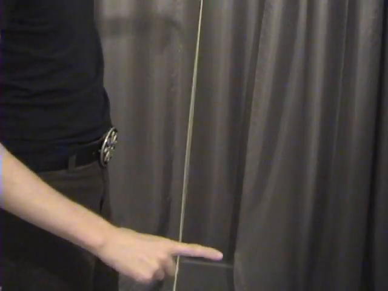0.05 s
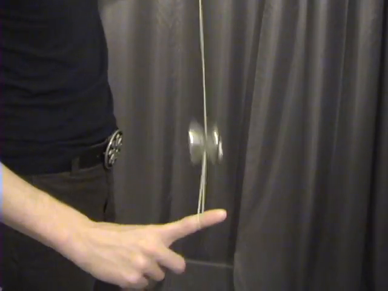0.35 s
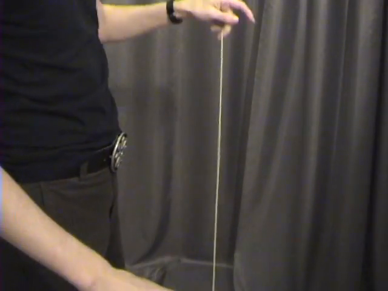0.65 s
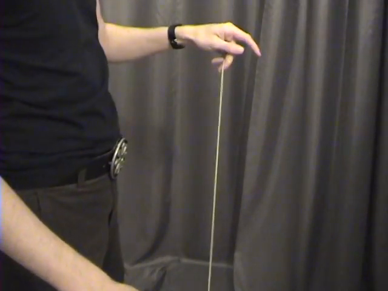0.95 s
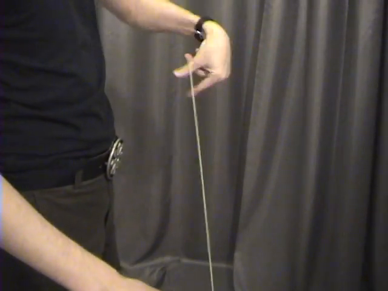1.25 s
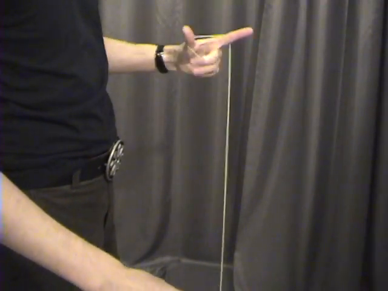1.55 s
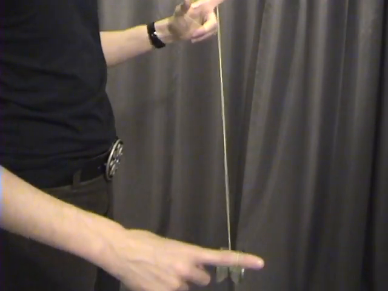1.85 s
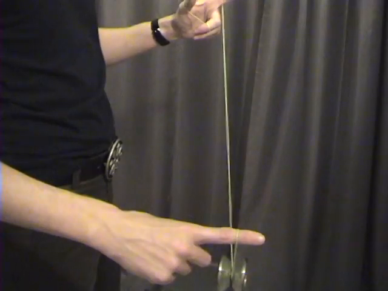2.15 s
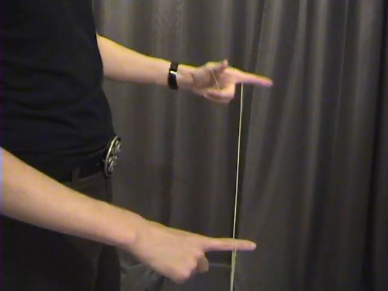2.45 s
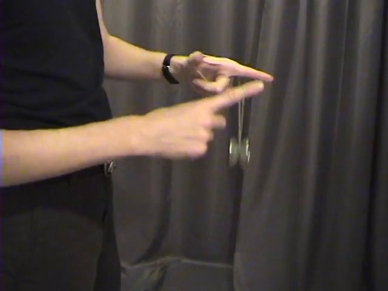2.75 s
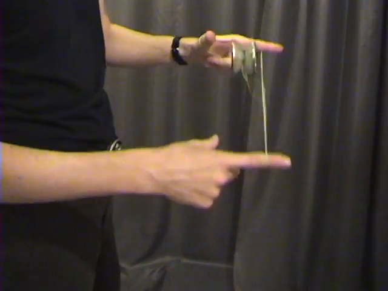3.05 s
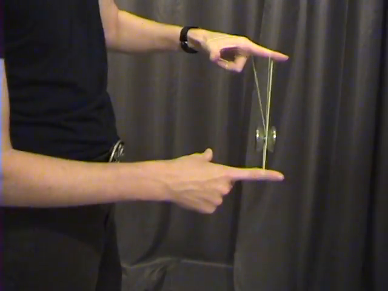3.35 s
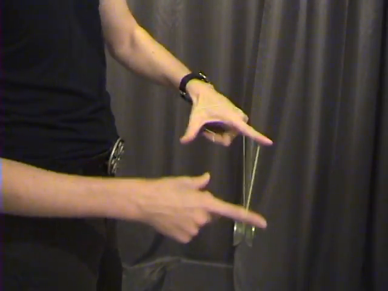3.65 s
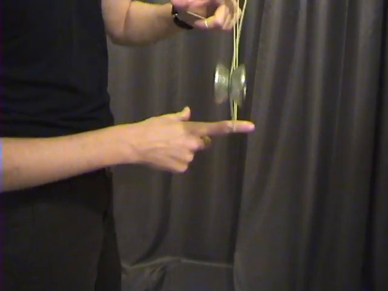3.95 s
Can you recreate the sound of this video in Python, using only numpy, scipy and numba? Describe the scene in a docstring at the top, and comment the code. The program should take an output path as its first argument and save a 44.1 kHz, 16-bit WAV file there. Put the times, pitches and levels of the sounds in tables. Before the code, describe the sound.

A yo-yo spins on its string with a high, whirring hiss over faint room hum.

```python
"""A ball-bearing yo-yo spins on its string in a curtained room, close to a small camera.
Impacts of the balls excite the bearing's bright resonance, which throbs once a turn as the spin runs down.
Friction of the string on the rims adds hiss; interference with a close reflection makes both swoosh
as the yo-yo is swung and hopped. A faint motor hum and room noise lie beneath."""
import sys
import numpy as np
from scipy import signal
from scipy.fft import rfft, irfft
from scipy.io import wavfile
from scipy.ndimage import uniform_filter1d, map_coordinates
from numba import njit

SR = 44100
rng = np.random.default_rng(int(sys.argv[2]) if len(sys.argv) > 2 else 0)


def wav_record(signal):
    """Record a signal, one row per channel, as 16-bit PCM in the file named by sys.argv[1]."""
    frames = np.transpose(np.atleast_2d(signal))
    bounded = np.clip(frames, -1, 1)
    # unit amplitude maps onto the largest positive 16-bit level
    quanta = np.round(bounded * 32767).astype(np.int16)
    wavfile.write(sys.argv[1], SR, quanta)


N = 176400
TIME_S = np.arange(N) / SR

# Loudness of the bearing's ring as it swells and dips: time_s, level_db
BEARING_LEVEL = [(0, -35), (.17, -29.5), (.29, -25.5), (.36, -31.5), (.46, -40), (.54, -30.5), (.6, -31),
                 (1.0, -32), (1.33, -34.5), (1.42, -31), (1.93, -30), (2.1, -30), (2.22, -33.5),
                 (2.39, -27.5), (2.47, -32), (2.68, -30), (2.78, -33.5), (2.84, -29.5), (2.99, -37.5),
                 (3.08, -33), (3.45, -32), (3.62, -34.5), (3.8, -30.5), (3.88, -32.5), (4, -36)]
# Once-a-turn modulation: time_s, depth_db
THROB_DEPTH = [(0, 1), (1.35, -3), (1.6, 2), (2.1, 2), (2.3, 0), (4, 1.5)]
# Response of bearing and shell: frequency_hz, gain_db
BEARING_SPECTRUM = [(2000, -46), (2660, -24.5), (3200, -39.5), (4250, -22.5), (4520, -15), (4700, -15.5),
                    (4920, -6), (5130, -2.5), (5320, -1.5), (5540, -2), (5800, -5.5), (6200, -13),
                    (6700, -16.5), (7350, -30.5), (8150, -18.5), (8600, -22.5), (9250, -25.5), (10500, -35),
                    (12000, -39.5), (13300, -40), (15000, -59)]
# Centre of the bright ring, swaying slightly in pitch: time_s, pitch_hz
RING_PITCH = [(0, 5350), (.23, 5080), (.36, 5480), (.44, 5200), (.8, 5290), (1.42, 5400), (1.52, 5270),
              (2.3, 5300), (2.66, 5440), (2.74, 5200), (2.86, 5170), (3.2, 5280), (3.5, 5430), (3.8, 5380),
              (3.91, 5100), (4, 5200)]
# Colour of ticks and string brushes: frequency_hz, gain_db
TICK_SPECTRUM = [(3000, -25), (5300, -3), (7000, -6), (8200, 0), (9200, -8), (10500, -5), (12000, -21),
                 (13300, -22), (15000, -38)]
def bearing(spin_hz=88.75, slowing_hz_per_s=4.5, impacts_per_s=2800, ticks_per_s=170):
    """Impact excitation: the balls ring the bearing, harder once a turn; a few hard hits tick."""
    turns = np.cumsum(spin_hz - slowing_hz_per_s * TIME_S) / SR
    flutter_db = .8 * walk(hz=43.8)
    throb = undb(curve(THROB_DEPTH) * np.cos(2 * np.pi * turns) + flutter_db)
    impacts = impulses(impacts_per_s, spread_db=3.1) * np.sign(noise())
    fizz = undb(-10) * noise()
    ring = colour((unit(impacts) + fizz) * throb, BEARING_SPECTRUM)
    ring = ring + undb(2.5) * resonate(ring, curve(RING_PITCH), width_hz=350.)
    ring = reflect(ring, echo_db=-8.5)
    ring = ring / np.sqrt(uniform_filter1d(ring ** 2, size=3000))  # even out slow level changes
    hard_hits = impulses(ticks_per_s * throb, spread_db=3) * throb
    ticks = undb(-21.5) * unit(colour(hard_hits, TICK_SPECTRUM))
    return (ring + ticks) * undb(curve(BEARING_LEVEL))


# Jerks of the string: centre_s, peak_db
JERKS = [(.164, -21), (.227, -19), (.2703, -14.5), (.3063, -21), (.3165, -21), (.524, -22), (.6145, -24),
         (.769, -21), (1.042, -21), (1.1195, -23), (1.131, -19.5), (1.413, -21), (1.519, -22),
         (1.6695, -21), (1.7185, -21), (2.3185, -14.5), (2.4078, -18), (2.472, -20), (2.519, -22),
         (2.826, -20)]
def knocks(pitch_hz=5310, sigma_s=.00092):
    """Backlash: each jerk knocks the bearing through its play, giving a Gaussian tone burst."""
    envelope = sum(undb(db) * np.exp(-((TIME_S - at) / sigma_s) ** 2 / 2) for at, db in JERKS)
    wavering_hz = pitch_hz * (1 + .023 * walk(hz=289.2))
    return envelope * np.sin(2 * np.pi * np.cumsum(wavering_hz) / SR)


# String rubbing the rims: time_s, level_db
RUB_LEVEL = [(0, -43), (.16, -46.5), (.23, -35.5), (.3, -39.5), (.39, -37.5), (.47, -43), (.62, -48.5),
             (1.2, -49.5), (1.7, -45.5), (2.45, -46.5), (2.68, -45.5), (3.11, -42), (3.3, -47),
             (3.8, -44.5), (4, -37)]
# Hiss of the fibres: frequency_hz, gain_db
FIBRE_SPECTRUM = [(2000, -28), (3500, -16.5), (5000, -3.5), (6500, 1.5), (7400, -5.5), (9000, -5.5),
                  (10300, -18), (12000, -24), (13300, -24), (15000, -33)]
# String brushing the shell: centre_s, half_width_s, level_db
SHELL_BRUSHES = [(.25, .05, -49), (.53, .025, -51), (1.66, .03, -51), (1.87, .03, -50), (2.09, .02, -49),
                 (2.34, .04, -47), (2.781, .002, -43)]
def string(roughness_db=3.5):
    """Sliding friction: the string hisses on the rims and briefly brushes the shell."""
    friction = noise() * undb(roughness_db * walk(hz=320))
    rub = undb(curve(RUB_LEVEL)) * unit(colour(friction, FIBRE_SPECTRUM))
    brushes = swells(SHELL_BRUSHES) * unit(colour(friction, TICK_SPECTRUM))
    return reflect(rub + brushes, echo_db=-2.5)


# Lag of the close reflection as the yo-yo moves: time_s, lag_ms
ECHO_LAG = [(0, .38), (.13, .31), (.19, .58), (.25, .6), (.36, .51), (.42, .455), (.53, .385), (.62, .22),
            (1.03, .22), (1.38, .3), (1.52, .39), (2.4, .385), (2.53, .325), (2.67, .32), (2.74, .39),
            (2.83, .4), (2.9, .455), (3.02, .46), (3.27, .31), (3.7, .3), (3.89, .41), (4, .45)]
def reflect(x, echo_db):
    """Comb filtering: a slightly dull reflection with a moving lag interferes with the direct sound."""
    dull = uniform_filter1d(x, size=3)
    lag_samples = curve(ECHO_LAG) * SR / 1000
    echo = map_coordinates(dull, [np.arange(N) - lag_samples], mode="mirror")
    return (x + undb(echo_db) * echo) / np.hypot(1, undb(echo_db))


# Motor partials: pitch_hz, left_db, right_db
MOTOR_PARTIALS = [(275.1, -60, -67), (292.9, -57, -66.5), (323.2, -60.5, -84), (361.7, -66.5, -80),
                  (470.6, -60.5, -74), (571, -56.5, -62), (614, -62, -85), (766, -60.5, -82),
                  (823, -59.5, -81), (1266, -76, -82), (1453, -73, -60), (1572, -63.5, -73.5),
                  (1740, -74, -76), (2111, -68, -66.5), (2194, -77, -73), (2214, -72, -68),
                  (2530, -60, -72), (2693, -68, -84)]
def motor(waver_rad=.6, left_lag_rad=.96):
    """Line spectrum: a small motor hums in steady partials that waver slightly in phase."""
    hum = 0
    for hz, left_db, right_db in MOTOR_PARTIALS:
        phase = 2 * np.pi * (hz * TIME_S + rng.random()) + waver_rad * walk(hz=10.4)
        left = undb(left_db) * np.sin(phase - left_lag_rad)
        right = undb(right_db) * np.sin(phase)
        hum = hum + np.sqrt(2) * np.array([left, right])
    return hum


# Tones in the whirr: centre_s, half_width_s, level_db, pitch_hz, waver_hz
HOLLOW_TONES = [(.005, 0.034, -45.5, 1140, 29.8), (1.044, 0.031, -56.5, 640, 46),
                (1.632, 0.026, -47, 561.4, 420), (1.737, 0.14, -52.5, 640, 60),
                (1.97, .13, -53.5, 559.6, 23), (2.1, 0.046, -50.5, 1100, 62), (2.34, 0.023, -56, 1360, 30),
                (2.37, 0.045, -53, 625, 44), (2.655, 0.11, -56, 663, 74), (2.758, 0.056, -51, 1078, 10),
                (3.543, 0.063, -53.5, 623, 74), (3.69, 0.067, -50.5, 1073, 8)]
def hollow_tones():
    """Random phase modulation widens faint, swelling tones into hollow narrow bands."""
    tones = 0
    for at, half_width, db, pitch_hz, waver_hz in HOLLOW_TONES:
        phase = 2 * np.pi * pitch_hz * TIME_S + walk(waver_hz)
        tones = tones + swells([(at, half_width, db)]) * np.sqrt(2) * np.sin(phase)
    return tones


# Motor whirr and room noise: frequency_hz, gain_db
WHIRR_SPECTRUM = [(20, -28), (48, -5), (75, -16.5), (150, -5), (240, -8), (282, 1), (340, -7), (420, -5),
                  (530, -1), (650, 5), (760, -4), (930, -5), (1090, 4), (1270, -4.5), (1400, -4),
                  (1500, 2.5), (1650, -14.5), (1900, -15), (2180, -8.5), (2370, -15.5), (2660, -3),
                  (2850, -14.5), (3300, -16), (6000, -6), (14000, -58)]
# Air stirred by the arms: centre_s, half_width_s, level_db
AIR_PUFFS = [(2.57, 0.056, -61), (3.1, 0.093, -62), (3.58, 0.059, -58)]
# Colour of the puffs: frequency_hz, gain_db
PUFF_SPECTRUM = [(12, -10), (30, -1), (60, -1), (150, -26), (600, -70)]
def whirr_and_puffs(whirr_db=-42.5):
    """Continuous spectra: steady motor and room noise, and low puffs of air from the moving arms."""
    whirr = undb(whirr_db) * unit(colour(noise(), WHIRR_SPECTRUM))
    puffs = swells(AIR_PUFFS) * unit(colour(noise(), PUFF_SPECTRUM))
    return whirr + puffs


def place(source, image):
    """Partial coherence: two microphones share the direct sound; each adds its own diffuse part."""
    lead_rad = over_bins(image, column=1)
    balance = undb(over_bins(image, column=2))
    diffuse = undb(over_bins(image, column=3))
    direct, channels = rfft(source()), []
    for side in (1, -1):  # left, right
        heard = direct * np.exp(.5j * side * lead_rad) + diffuse * rfft(source())
        pan = np.sqrt(2 / (1 + balance ** (-2 * side)))
        channels.append(irfft(heard * pan / np.hypot(1, diffuse), N))
    return np.array(channels)


def undb(db):
    """Decibels to gain."""
    return 10 ** (np.asarray(db) / 20)


def unit(x):
    """Scale to rms 1."""
    return x / np.sqrt(np.mean(x ** 2))


def curve(rows):
    """Linear interpolation over time."""
    return np.interp(TIME_S, *np.transpose(rows))


def over_bins(rows, column=1):
    """Interpolation of one column over log frequency."""
    rows = np.array(rows)
    bin_hz = np.arange(N // 2 + 1) * SR / N
    return np.interp(np.log(bin_hz + 1), np.log(rows[:, 0]), rows[:, column])


def colour(x, spectrum):
    """Minimum-phase filter: folding the cepstrum makes the response causal."""
    cepstrum = irfft(np.log(undb(over_bins(spectrum))), N)
    cepstrum[1:N // 2] *= 2
    cepstrum[N // 2 + 1:] = 0
    return irfft(rfft(x) * np.exp(rfft(cepstrum)), N)


def noise():
    """White noise."""
    return rng.standard_normal(N)


def impulses(per_s, spread_db):
    """Poisson process: independent impacts of random strength."""
    hits = rng.random(N) < per_s / SR
    return hits * undb(spread_db * np.clip(noise(), -2, 2))


def walk(hz):
    """Smooth random motion up to about hz, rms 1."""
    bins = rfft(rng.standard_normal(N // 20))
    lowpass = np.exp(-(np.arange(len(bins)) * SR / N / hz) ** 2)
    slow = unit(irfft(bins * lowpass))
    return np.interp(np.arange(N) / 20, np.arange(len(slow)), slow)


def swells(rows):
    """Gaussian envelopes, each down to 1/e one half-width from its centre."""
    return sum(undb(db) * np.exp(-((TIME_S - at) / half_width) ** 2) for at, half_width, db in rows)


@njit
def resonate(x, centre_hz, width_hz):
    """Second-order resonance: a band-pass with a moving centre."""
    y, band_state, low_state = np.empty(len(x)), 0., 0.
    for i in range(len(x)):
        tuning = np.tan(np.pi * centre_hz[i] / SR)
        damping = width_hz / centre_hz[i]
        band = (band_state + tuning * (x[i] - low_state)) / (1 + tuning * (tuning + damping))
        band_state = 2 * band - band_state
        low_state += 2 * tuning * band
        y[i] = damping * band
    return y


# Stereo images: frequency_hz, left_lead_rad, left_minus_right_db, diffuse_to_direct_db
YOYO_STEREO = [(3000, -.8, 1, -6), (4500, -.55, 0, -9), (5300, -.63, -.5, -16), (6700, -.72, -2, -8),
               (8200, -1.4, -4.5, -4), (9500, -2.4, -3, 2), (10400, 0, -1, 0), (12500, 0, 0, -16)]
WHIRR_STEREO = [(30, -1.5, 0, 2), (201, -2, -1.5, -8), (286, -3, 11.5, -4), (376, -1.8, 3, -2),
                (660, -2, 7, -9.5), (1110, -2.5, 3, -1.5), (1540, -2.5, 6, -6.5), (1900, 0, 3, 3),
                (2630, -0.96, -1, -5.5), (6000, -1.5, 11.5, -12)]
def scene():
    """Superposition: the yo-yo in front, the hum around it and stronger on the left."""
    yoyo = place(lambda: bearing() + string(), YOYO_STEREO) + knocks()
    return yoyo + place(whirr_and_puffs, WHIRR_STEREO) + motor() + hollow_tones()


def record(dry, cutoff_hz=15400):
    """Band limiting: the camera's steep low-pass cuts the top treble."""
    return signal.sosfilt(signal.ellip(8, .2, 70, cutoff_hz, fs=SR, output="sos"), dry)


dry = scene()
out = record(dry)
wav_record(out)
```